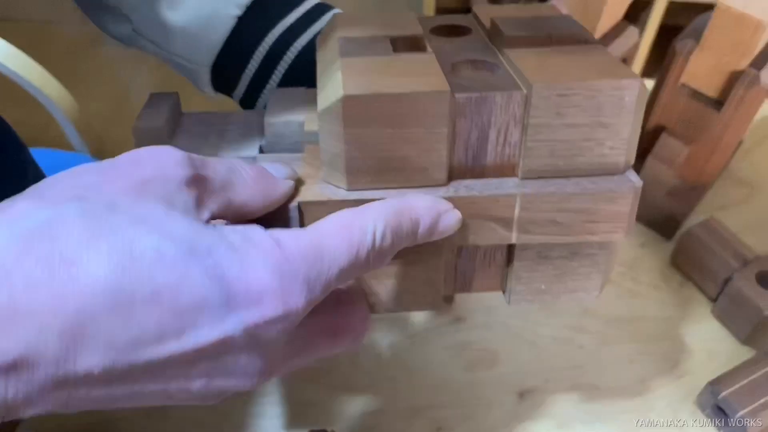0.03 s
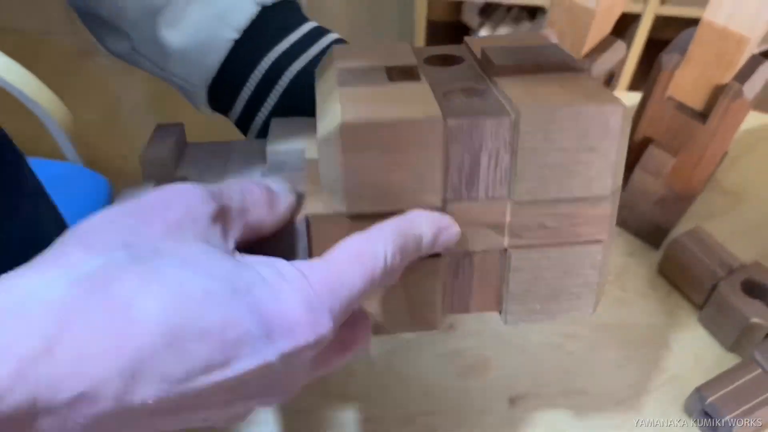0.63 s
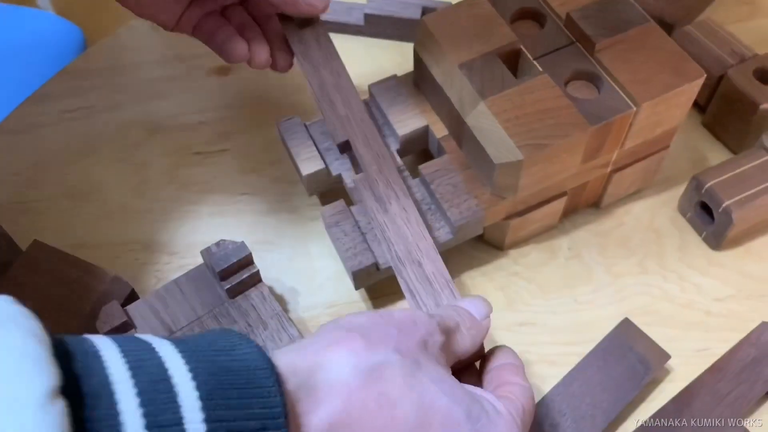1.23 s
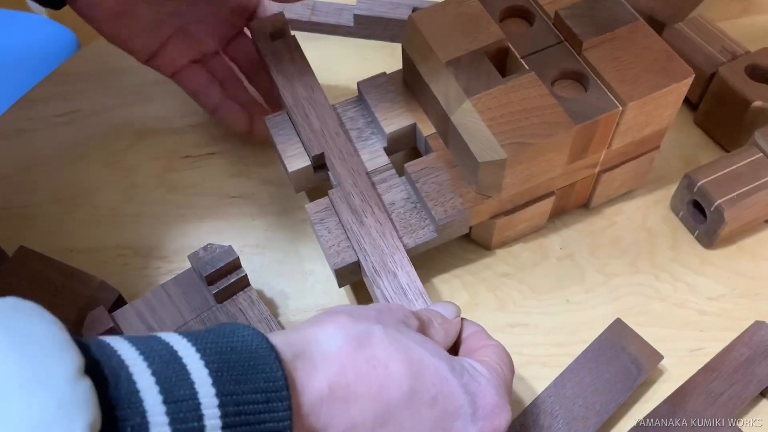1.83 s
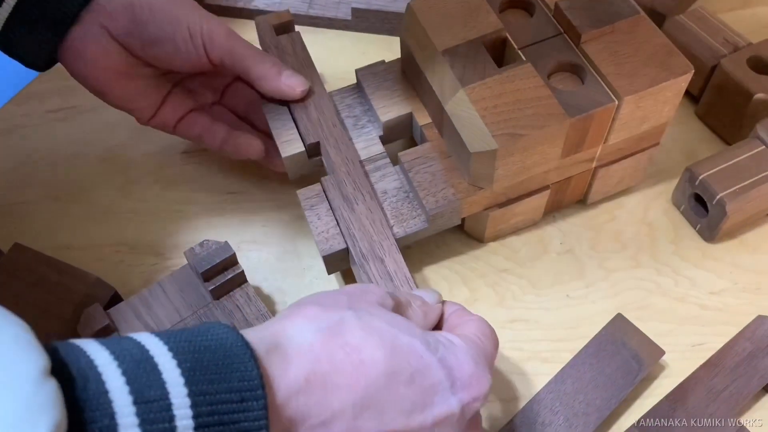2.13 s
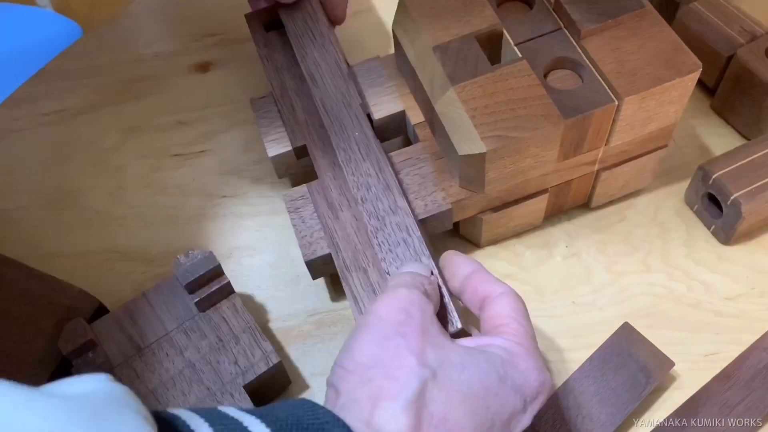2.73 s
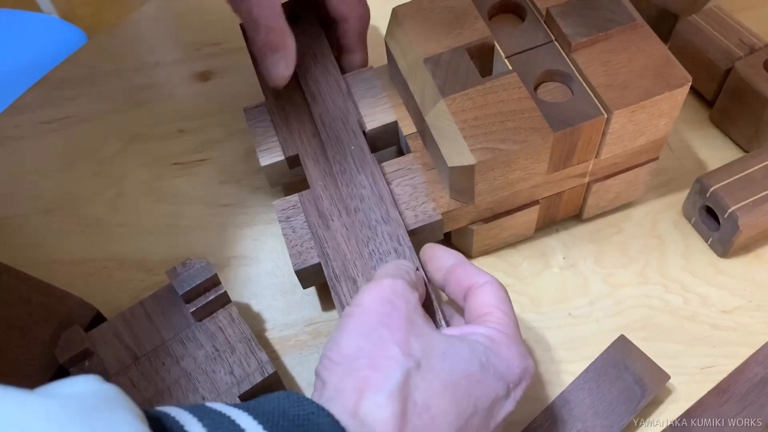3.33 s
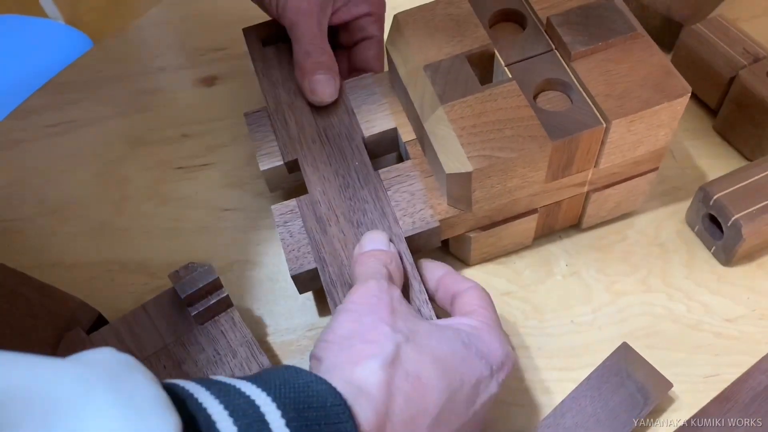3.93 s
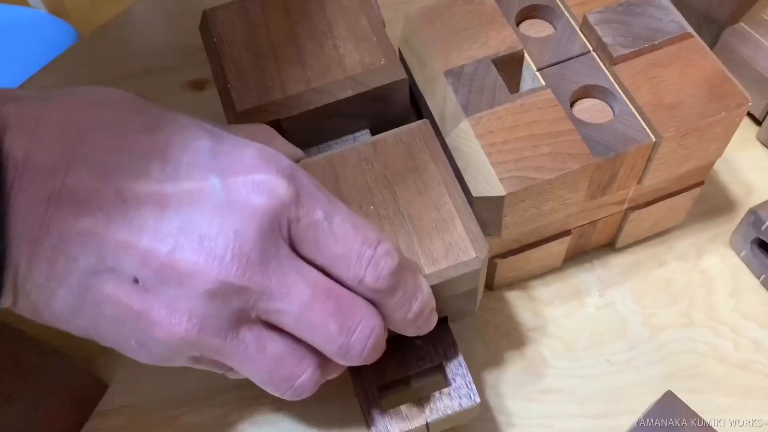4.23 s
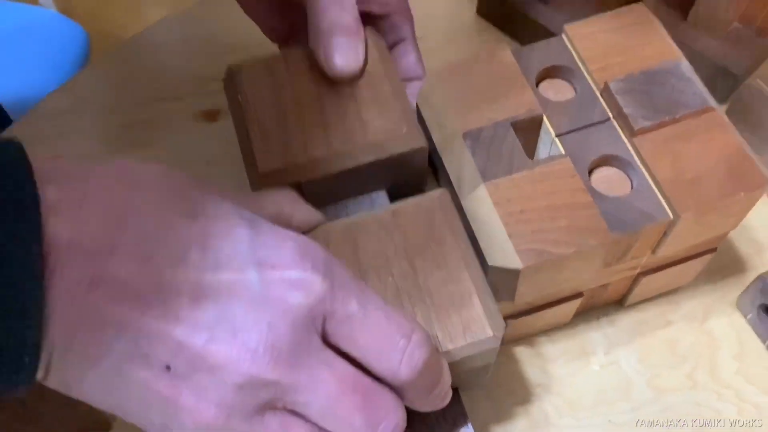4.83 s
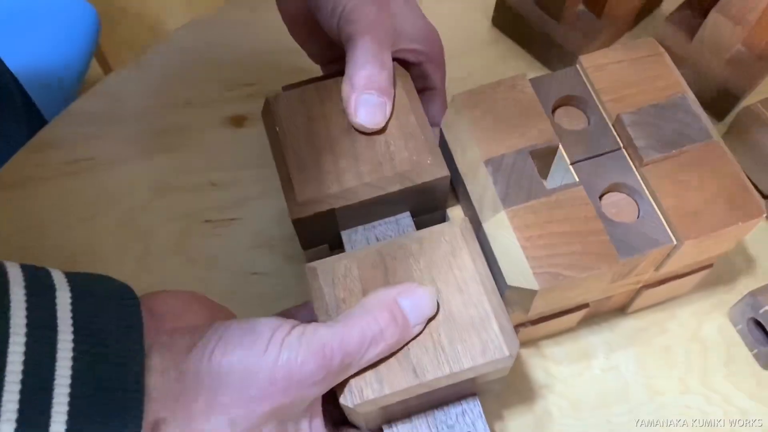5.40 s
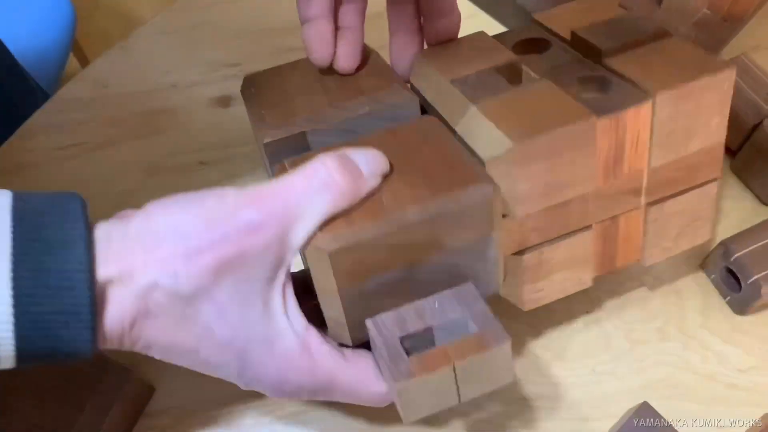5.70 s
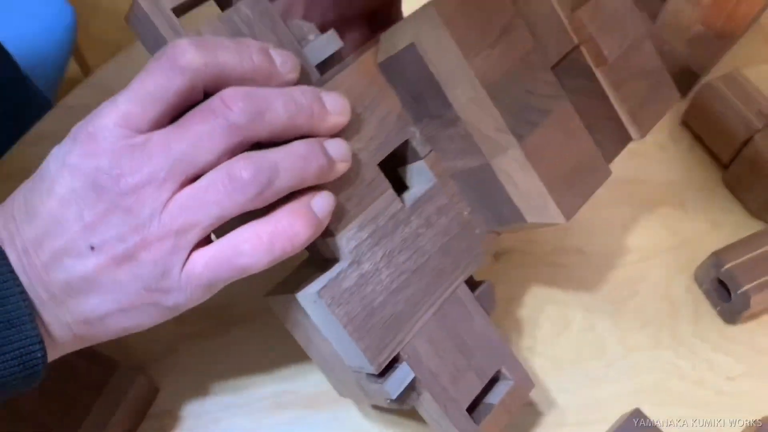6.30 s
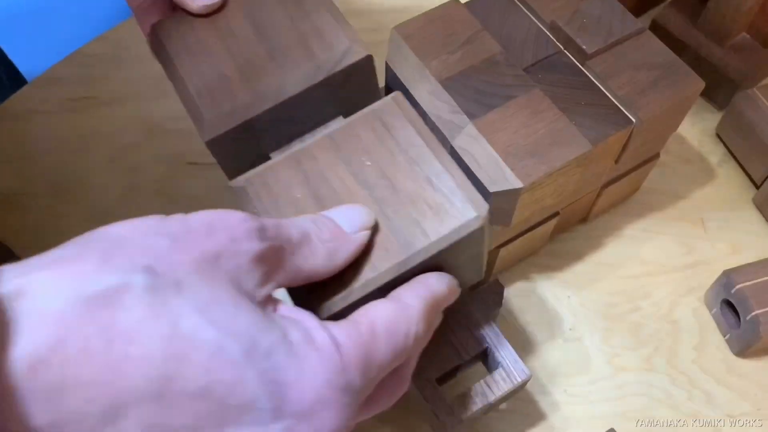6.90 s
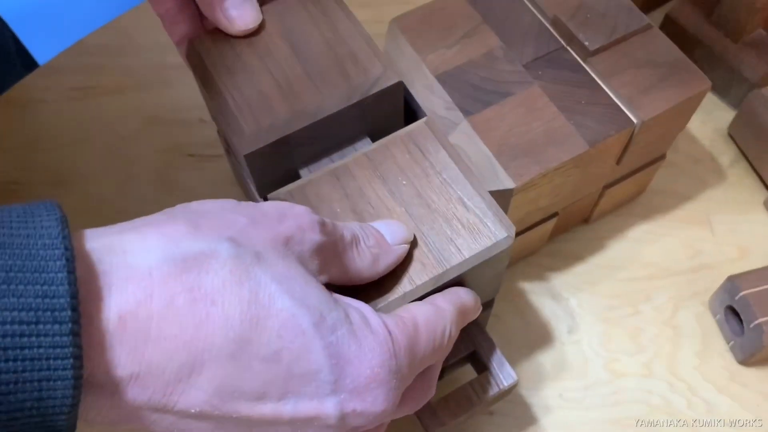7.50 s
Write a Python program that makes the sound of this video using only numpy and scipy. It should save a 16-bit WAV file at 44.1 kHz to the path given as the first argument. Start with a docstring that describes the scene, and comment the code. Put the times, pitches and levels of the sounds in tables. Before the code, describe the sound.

Hands join the hardwood pieces of a large puzzle on a table. Light clicks and rubbing come first, then scattered hollow knocks. A sharp clack leads into a busier run of knocks, table thumps and short scrapes, with a tiny squeak and the loudest clack past the middle. Soft sliding follows, then a few dull thumps and a faint rattle. The microphone is close, in a small quiet room.

```python
"""Fitting a wooden puzzle together

Hands join the hardwood pieces of a large puzzle on a table, close to a phone in a small quiet room.
Each contact rings the piece (clack), the half-built frame (knock) and the table top (thump); less reaches
the table when the work is lifted. In between, hands press the frame down, wood slides on wood with ticks,
rattles and squeaks, fingers brush the grain, and a tight joint judders once."""
import sys
import numpy as np
from scipy import signal
from scipy.fft import rfft, irfft, next_fast_len
from scipy.io import wavfile
from scipy.ndimage import uniform_filter1d

SR = 44100
rng = np.random.default_rng(int(sys.argv[2]) if len(sys.argv) > 2 else 0)


def materialize(psi):
    """Save the field psi as 16-bit PCM at rate SR to the path in sys.argv[1].

    A 1-D psi becomes a single channel; in a 2-D psi each row is a channel.
    """
    bounded = np.clip(np.atleast_2d(psi).T, -1, 1)
    quanta = np.round(bounded * 32767).astype(np.int16)
    wavfile.write(sys.argv[1], SR, quanta)


N = 332955
T = np.arange(N) / SR
RING_T = np.arange(16384) / SR  # time axis of one ringing blow

# A mode is a tone that an object rings at; t60 is the time it takes to fade by 60 dB.
# modes of the half-built frame and of a thick block: f/Hz, level/dB, t60/s
FRAME_MODES = [(330.4, -4.5, 0.035), (321.5, 0, 0.07), (407.9, -3, 0.11), (469.8, -7, 0.065),
               (538.3, -11, 0.08), (614, -12, 0.055)]
BLOCK_MODES = [(665, -5, 0.024), (1316, -3, 0.018), (1486, -3, 0.016), (1840, -0.5, 0.01),
               (3190, -11.5, 0.011), (4065, -15, 0.02), (4600, -14.5, 0.012), (8430, -30.5, 0.01)]
# stages of the work: start/s, piece in hand (from 3.41 s the bars laid side by side, which ring like one thick
# block), rumble over rasp/dB, hiss over rasp/dB, background change/dB
STAGES = [(0, "body", -14, -11, 0), (0.75, "bar", 10, -15, 0), (2.642, "bar", 3, -11.5, -1.5),
          (3.41, "block", 3, -11, -2), (4.113, "block", 7.5, -12.5, -1), (4.68, "cap", 2, -14.5, 6),
          (5.406, "body", -22.5, -28, 1.5), (6.667, "block", 27, -22.5, 0)]
# wood slides on wood, and fingers brush the grain: start/s, end/s, level/dB
SLIDES = [(0.057, 0.292, -55), (1.955, 2.297, -61.5), (2.674, 2.866, -53.5), (2.993, 3.15, -63),
          (3.262, 3.394, -47), (4.21, 4.291, -53), (4.293, 4.487, -65.5), (4.693, 4.766, -46.5),
          (4.759, 4.776, -31.5), (4.801, 5.001, -48), (5.0, 5.232, -57.5), (5.467, 5.553, -58.5),
          (5.599, 5.796, -59), (5.789, 6.201, -61.5), (6.382, 6.661, -66), (6.7, 7.5, -86.5)]
BRUSHES = [(0.144, 0.172, -44.5), (0.21, 0.252, -51), (0.261, 0.3, -54), (0.428, 0.452, -63.5),
           (0.652, 0.735, -66), (1.242, 1.257, -55), (1.957, 2.136, -64), (2.784, 2.834, -60),
           (3.302, 3.39, -53.5), (5.78, 5.901, -62.5), (5.955, 6.007, -57.5), (6.053, 6.214, -65.5),
           (6.482, 6.62, -62.5)]


def knocks():
    """Wood strikes wood; the faces graze each other just before each blow lands."""
    # t/s, table thump/dB, frame knock/dB, piece clack/dB, hardness/dB, tone the struck spot favours/Hz
    blows = [(0.049, -80.5, -56, -40, -8, 1770), (0.154, -69, -54.5, -36, -22, 1000),
             (0.212, -75, -49, -38.5, -8.5, 1570), (0.243, -62.5, -57, -48.5, -22, 1120),
             (0.337, -75, -55, -42, -21.5, 1000), (0.443, -81, -63, -51, -18, 1230),
             (1.248, -46.5, -35.5, -42, -13, 324), (1.463, -54, -45, -41.5, -15.5, 1350),
             (1.61, -46.5, -39, -50, -15, 345), (1.748, -50.5, -48.5, -50, -19.5, 342),
             (2.087, -46.5, -41.5, -40, -24, 1195), (2.846, -40.5, -39.5, -49.5, -9.5, 322),
             (3.188, -37.5, -35.5, -25, 4, 4300), (3.329, -41, -44, -38.5, -11.5, 1100),
             (3.423, -38.5, -34.5, -67.5, -18.5, 410), (3.477, -30, -28.5, -27, -6, 2000),
             (3.61, -41.5, -31, -46.5, -17.5, 317), (3.881, -43.5, -51, -51.5, -22.5, 1110),
             (3.933, -30.5, -26, -46.5, -29.5, 332), (4.023, -44, -48.5, -52.5, -25, 1480),
             (4.419, -54, -58.5, -53.5, -8, 2220), (4.489, -24.5, -32, -25.5, -11, 1400),
             (4.636, -30, -28, -48.5, -20.5, 320), (4.703, -34, -33.5, -57.5, -15, 300),
             (4.772, -32, -30, -17.5, -2.5, 1650), (4.917, -37, -41, -46, -30, 350),
             (5.111, -61, -48.5, -53, -8.5, 530), (5.254, -30.5, -29, -30, -15, 468),
             (5.804, -71, -62, -41.5, -14, 1050), (6.021, -75, -72, -54, -13, 600),
             (6.084, -55, -80, -59, -9, 1820), (7.004, -33.5, -34.5, -42, -9, 640),
             (7.295, -34, -40, -61, 1, 294)]
    graze_s, graze_over_clack_db = 0.018, -17.5
    out = np.zeros((2, N))
    for s, thump_db, knock_db, clack_db, hard_db, spot_hz in blows:
        modes = stage_at(s)[0]
        add(out, s - graze_s, at_level(graze(graze_s, modes), graze_s, clack_db + graze_over_clack_db))
        piece, frame = favour(modes, spot_hz), favour(FRAME_MODES, spot_hz)
        add(out, s, contact(piece, frame, thump_db, knock_db, clack_db, hard_db))
    return out


def presses():
    """A hand presses the frame onto the table: a soft thump that barely rings the wood."""
    pushes = [(1.437, -43), (1.965, -45), (2.114, -50), (2.514, -44), (2.823, -41), (4.084, -43),
              (4.764, -33), (7.061, -35.5), (7.149, -33), (7.247, -39), (7.384, -41)]  # t/s, thump/dB
    rise = 1 - np.exp(-RING_T / 0.0033)
    out = np.zeros((2, N))
    for s, db in pushes:
        press = contact(stage_at(s)[0], damped(FRAME_MODES),
                        thump_db=db, knock_db=db - 8.5, clack_db=db - 22, hard_db=-15)
        add(out, s, press * rise)
    return out


def contact(piece_modes, frame_modes, thump_db, knock_db, clack_db, hard_db):
    """Every contact shakes the piece in the hand, the frame it meets and the table below."""
    table_modes = [(52, -11, .15), (129, 5, 0.1), (155, 1, 0.11), (172.7, 0, 0.086), (201, -6, 0.074)]  # the table top: f/Hz, level/dB, t60/s
    frame = unit(ring(frame_modes, scatter_db=3.5, detune=0.028, travel_s=0.00074))
    frame += undb(-11.5) * unit(band(burst(t60=0.13), 120, 870))
    table = ring(table_modes, scatter_db=4.5, detune=0.01, travel_s=0.0017)
    knock = undb(knock_db) * frame / strength(frame, 250, 750)
    thump = undb(thump_db) * table / strength(table, 80, 230)
    return undb(clack_db) * clack(piece_modes, hard_db) + knock + thump


def clack(modes, hard_db, grain_db=-8, grain_t60=0.037, bounce_db=-8):
    """A piece and its grain ring, the faces bounce shut, and a soft contact loses its treble."""
    x = unit(ring(modes, scatter_db=3, detune=0.015, travel_s=0.00057))
    x += undb(grain_db) * grain(modes, grain_t60)
    gap = int(SR * rng.uniform(.001, .003))
    bounce = np.pad(grain(modes, grain_t60), ((0, 0), (gap, 0)))[:, :len(RING_T)]
    x += undb(bounce_db) * bounce
    # hardness is the treble level over the middle range; tilt the sound towards it
    tilt_db = hard_db - 20 * np.log10(strength(x, 2800, 7000) / strength(x, 800, 2600))
    x = colour(x, [(1100, 0.0053), (2300, 0.81 * tilt_db), (3600, 1.42 * tilt_db),
                   (9000, 2.7 * tilt_db), (15000, 1.5 * tilt_db - 9)])
    return x / strength(x, 800, 2600)


def ring(modes, scatter_db, detune, travel_s, lag_s=.0001, side_db=3):
    """Wood rings, struck at a random spot under a changing grip; high modes spread unevenly to the sides."""
    out, sides = 0, np.array([[-.5], [.5]])
    for hz, db, t60 in modes:
        spot, grip, path, lean = rng.standard_normal(4)
        delay_s = travel_s * np.sqrt(1000 / hz)  # low bending waves arrive later
        t = np.maximum(RING_T - delay_s - sides * lag_s * (1 + 1.1 * path), 0)
        gain = undb(db + scatter_db * spot + sides * side_db * lean * min(hz / 1500, 2))
        rise = 1 - np.exp(-t / (0.0011 + 0.16 / hz))
        out = out + gain * rise * decay(t, t60) * np.sin(2 * np.pi * hz * (1 + detune * grip) * t)
    return out


def grain(modes, t60, below_db=-15, above_db=-9):
    """Many short-lived modes of the touching wood crowd around a piece's own."""
    points = sorted((hz, db) for hz, db, _ in modes)
    (low_hz, low_db), (top_hz, top_db) = points[0], points[-1]
    curve = [(low_hz / 2, low_db + below_db), *points, (2 * top_hz, top_db + above_db)]
    return unit(colour(burst(t60), curve))


def burst(t60):
    """Fading noise stands for a crowd of modes and nearby echoes."""
    return stereo_noise(len(RING_T)) * (1 - np.exp(-RING_T / .0008)) * decay(RING_T, t60)


def favour(modes, spot_hz, boost_db=4.5, octaves=0.31):
    """The struck spot drives the modes near one frequency harder."""
    return [(hz, db + boost_db * np.exp(-(np.log2(hz / spot_hz) / octaves) ** 2), t60)
            for hz, db, t60 in modes]


def damped(modes):
    """Modes under a hand die twice as fast."""
    return [(hz, db, t60 / 2) for hz, db, t60 in modes]


def stage_at(s):
    """Modes of the piece in hand at time s, and how much a slide rumbles and hisses then (dB)."""
    # the assembled body, a slim bar and the capping block: f/Hz, level/dB, t60/s
    body = [(598, -0.5, 0.025), (734, 1, 0.022), (1078, 2, 0.02), (1198, 3, 0.019), (1647, 3, 0.012),
            (1874, 0.5, 0.015), (2268, -3.5, 0.0226), (2740, -5.5, 0.0062), (4510, -21, 0.0457)]
    bar = [(1160, -4.5, 0.016), (1262, -3.5, 0.026), (1440, -2, 0.016), (1830, -4, 0.013),
           (2220, 0.5, 0.021), (3180, -7, 0.03), (3590, -3.5, 0.021), (4070, 1, 0.0082), (4400, -4, 0.035),
           (8400, -11, 0.025), (10800, -15.5, 0.018)]
    cap = [(614, -13, 0.032), (1394, -1.5, 0.015), (1616, -1, 0.016), (1819, -2, 0.022), (2204, 1, 0.026),
           (2570, 0.5, 0.016), (3517, -0.5, 0.022), (3850, -4.5, 0.014), (5650, -11.5, 0.0054),
           (7460, -13, 0.014)]
    pieces = {"body": body, "bar": bar, "block": BLOCK_MODES, "cap": cap}
    _, piece, rumble_db, hiss_db, _ = STAGES[sum(s >= row[0] for row in STAGES[1:])]
    return pieces[piece], rumble_db, hiss_db


def graze(length, modes, growth_db=13):
    """A short rasp that grows until the blow lands."""
    x = rasp(length, modes)
    return x * undb(growth_db * np.minimum(T[:x.shape[1]] / length, 1))


def sliding():
    """Wood dragged over wood rasps in the piece, rumbles in the table and hisses in the grain."""
    # tone of the table's rumble, and the dulling of the hiss compared with fingers: f/Hz, level/dB
    rumble_curve = [(30, -22.5), (65, -1), (125, 3), (190, 6), (250, -9), (330, -5.5), (480, -15.5),
                    (750, -25.5), (1500, -48)]
    dulling = [(8500, -2), (13000, -10.5)]
    out = np.zeros((2, N))
    for start, length, db in spans(SLIDES):
        modes, rumble_db, hiss_db = stage_at(start)
        rumble = colour(friction(length, slips_per_s=1300, spread_db=3, flicker_db=-2.5), rumble_curve)
        layers = (rasp(length, modes), 0), (rumble, rumble_db), (colour(hiss(length), dulling), hiss_db)
        for layer, over_db in layers:
            add(out, start - .005, at_level(layer, length, db + over_db))
    return out


def rasp(length, modes):
    """Closely packed slips ring the piece that is dragged."""
    rasp_curve = [(200, -13.5), (550, -6), (1150, -4), (2200, -2), (3000, -9.5), (4400, -9), (6000, -11.5),
                  (10000, -30.5)]  # tone of the rasp: f/Hz, level/dB
    slips = friction(length, slips_per_s=8700, spread_db=0.4, flicker_db=6)
    return colour(resonate(slips, modes, dry_db=6), rasp_curve)


def hiss(length):
    """The grain hisses under a stroke and rings its high modes."""
    grain_modes = [(4257, -1.5, 0.011), (5070, -7, 0.004), (8580, 0, .012), (9510, -3, .01)]  # f/Hz, level/dB, t60/s
    hiss_curve = [(2500, -24), (4400, -4), (6200, -4), (8300, -2), (10500, 2.5), (13500, -0.5),
                  (16000, -17)]  # tone of the hiss: f/Hz, level/dB
    slips = friction(length, slips_per_s=3000, spread_db=3, flicker_db=3.5)
    return colour(resonate(slips, grain_modes, dry_db=2), hiss_curve)


def friction(length, slips_per_s, spread_db, flicker_db, edge_s=0.029):
    """One stroke: countless tiny slips of uneven size, in fits and starts, with time to ring out."""
    t = T[:int((length + .1) * SR)]
    edge_s = min(edge_s, length / 2)
    slipping = rng.random(len(t)) < slips_per_s / SR
    sizes = undb(spread_db * np.minimum(rng.exponential(size=len(t)), 4))
    fade = np.clip(np.minimum(t, length + edge_s - t) / edge_s, 0, 1)
    pressure = fade * (1 + .5 * np.sin(np.pi * t / length))
    slips = two_mics(slipping * sizes * rng.standard_normal((2, len(t))))
    return slips * pressure * undb(flicker_db * wander(70, len(t)))


def resonate(x, modes, dry_db):
    """Rubbing is heard partly through the ringing wood, partly straight from the contact (dry)."""
    response = ring(modes, scatter_db=5, detune=0.031, travel_s=0.000099)
    ringing = signal.fftconvolve(x, response, axes=1)[:, :x.shape[1]]
    return unit(ringing) + undb(dry_db) * unit(x)


def ticks(grit_per_s=110, grit_db=-2.5, scatter_db=4):
    """Rubbing catches on grit at random, as hard as the stroke presses; a few catches stand out."""
    catches = [(0.167, -38.5, 1200), (0.204, -31, 1500), (0.329, -34.5, 995), (1.971, -44, 4470),
               (2.803, -35, 12540)]  # a sliding edge catches: t/s, peak/dB, f/Hz
    out = np.zeros((2, N))
    for place, chance, pitch in rng.random((int(grit_per_s * N / SR), 3)):
        s = place * N / SR
        pressure = sum(undb(db) for start, end, db in SLIDES + BRUSHES if start <= s < end)
        size = undb(grit_db + scatter_db * min(-np.log(1 - chance), 3))
        add(out, s, pressure * size * tick(1800 * 5 ** pitch))
    for s, db, hz in catches:
        add(out, s, undb(db) * tick(hz))
    return out


def tick(hz, t60=0.006):
    """A rough spot lets go: a tiny crack that rings briefly around one frequency."""
    crack = rng.standard_normal((2, 1024)) * decay(T[:1024], t60)
    x = band(crack, .7 * hz, min(1.35 * hz, .45 * SR))
    return x / abs(x).max()


def brushing():
    """Fingers passing over the wood raise only the hiss of the grain."""
    out = np.zeros((2, N))
    for start, length, db in spans(BRUSHES):
        add(out, start - .005, at_level(hiss(length), length, db))
    return out


def rattling():
    """Loose joints chatter: a low grumble in the frame and a dry clatter in the piece."""
    rattles = [(0.16, 0.289, -62, -52), (1.821, 1.934, -61.5, -65.5), (2.721, 2.751, -56.5, -68.5),
               (5.495, 5.535, -63, -51.5), (7.019, 7.1, -52, -63), (7.138, 7.257, -54.5, -70),
               (7.301, 7.39, -51, -59)]  # start/s, end/s, frame/dB, piece/dB
    out = np.zeros((2, N))
    for start, end, frame_db, piece_db in rattles:
        length = end - start
        grumble = chatter(length, damped(FRAME_MODES[3:]) + BLOCK_MODES[:1], t60=.012)
        clatter = chatter(length, stage_at(start)[0], t60=0.0076)
        add(out, start, at_level(band(grumble, 230, 850), length, frame_db))
        add(out, start, at_level(band(clatter, 600, 2200), length, piece_db))
    return out


def chatter(length, modes, t60, bumps_per_s=120, scatter_db=3.5):
    """Uneven little bumps ring the wood around its modes."""
    bumps = np.zeros((2, N))
    count = int(length * bumps_per_s) + 1
    for k, (late, size) in enumerate(zip(rng.random(count), rng.standard_normal(count))):
        bump = rng.standard_normal((2, 2048)) * decay(T[:2048], t60)
        add(bumps, (k + .8 * late) / bumps_per_s, undb(scatter_db * size) * bump)
    return resonate(two_mics(bumps[:, :int((length + .1) * SR)]), modes, dry_db=0)


def judder(start_s=2.905, length=.085, slip_hz=68, db=-42):
    """A tight joint sticks and slips in a short, regular run that drums on the table."""
    progress = np.clip((T - start_s) / length, 0, 1)
    phase = 2 * np.pi * slip_hz * T
    drumming = np.sin(phase) + undb(-10) * np.sin(2 * phase)
    return undb(db) * np.sqrt(2) * np.sin(np.pi * progress ** .6) * drumming


def squeaks(width_hz=450):
    """Slips between tight faces feed one thin, high tone, which glides as the contact moves."""
    glides = [(1.928, 1.999, -65, 4440, 4460), (2.884, 2.927, -67, 4220, 4050),
              (4.714, 4.767, -50.5, 3420, 3626), (6.07, 6.209, -69.5, 4385, 4960),
              (6.49, 6.64, -72, 5500, 5695), (6.491, 6.649, -68.5, 8660, 8740)]  # start/s, end/s, level/dB, first f/Hz, last f/Hz
    out = np.zeros((2, N))
    for start, end, db, from_hz, to_hz in glides:
        length = max(end - start, .01)
        slips = band(friction(length, slips_per_s=1000, spread_db=1, flicker_db=4), 5, width_hz / 2)
        hz = np.interp(T[:slips.shape[1]], [0, length], [from_hz, to_hz])
        tone = np.sin(2 * np.pi * np.cumsum(hz) / SR)
        add(out, start, at_level(slips * tone, length, db))
    return out


def room(x):
    """The walls return a wash of echoes that builds up over a few milliseconds."""
    echo_bands = [(126, 0.65, -2.5), (287, 0.65, -8.5), (715, 0.53, -7), (1487, 0.45, -9.5),
                  (2940, 0.41, -8.5), (6050, 0.33, -8), (11800, .45, -15.5)]  # f/Hz, t60/s, echo over direct sound/dB
    hz, t60, db = np.transpose(echo_bands)
    log_hz = np.log(np.fft.rfftfreq(SR, 1 / SR) + 1)
    spectrum, t, tail = rfft(stereo_noise(SR)), T[:SR], 0
    for k, weights in enumerate(np.eye(len(hz))):
        band_noise = irfft(spectrum * np.interp(log_hz, np.log(hz), weights), SR)
        fade = decay(t, t60[k]) * (1 - np.exp(-t / 0.002)) * (1 + np.exp(-t / 0.045))
        tail = tail + undb(db[k]) * band_noise * fade / np.linalg.norm(fade)
    return signal.fftconvolve(x, tail, axes=1)[:, :N]


def hum(hz=44, db=-53.5):
    """A low hum wavers during the last stage."""
    gain = undb(db + 1.2 * wander(8))
    fade_in = np.clip((T - STAGES[-1][0]) / 0.022, 0, 1)
    return gain * fade_in * np.sqrt(2) * np.sin(2 * np.pi * hz * T + .3 * wander(10))


def room_air(db=-63):
    """Faint background noise whose level steps up or down at the start of each stage."""
    air_curve = [(25, -8), (50, -1.5), (125, -9), (250, -13.5), (1000, -16), (2200, -23), (4300, -27),
                 (6000, -33), (9500, -29), (15500, -37)]  # tone of the air: f/Hz, level/dB
    starts, *_, change_db = zip(*STAGES)
    stage_db = np.array(change_db)[np.searchsorted(starts[1:], T)]
    air = unit(colour(stereo_noise(N), air_curve))
    return air * undb(db + stage_db + wander(7.7))


def swelling_hiss(start_s=0.852, rise_s=0.033, hold_s=0.364, fade_s=0.077, db=-64.5):
    """A soft hiss swells once and fades."""
    swell_curve = [(150, -9), (1100, -1), (5000, -5), (15000, -23)]  # tone of the hiss: f/Hz, level/dB
    t = np.maximum(T - start_s, 0)
    shape = np.minimum(t / rise_s, 1) * np.exp(-np.maximum(t - hold_s, 0) / fade_s)
    return undb(db) * unit(colour(stereo_noise(N), swell_curve)) * shape


def undb(db):
    """Turn decibels into a gain."""
    return 10 ** (np.asarray(db) / 20)


def unit(x):
    """Scale to an average (rms) level of 1."""
    return x / np.sqrt(np.mean(x ** 2))


def decay(t, t60):
    """A fade that loses 60 dB every t60 seconds."""
    return np.exp(-np.log(1000) * t / t60)


def at_level(x, length, db):
    """Scale a stroke to an average level over its length."""
    return undb(db) * x * np.sqrt(length * SR / np.sum(np.mean(x ** 2, axis=0)))


def strength(x, lo_hz, hi_hz):
    """Average level of a blow's first 30 ms between two frequencies."""
    return np.sqrt(np.mean(band(x[:, :1320], lo_hz, hi_hz) ** 2))


def band(x, lo_hz, hi_hz):
    """Keep what lies between two frequencies."""
    return signal.sosfilt(signal.butter(3, [lo_hz, hi_hz], "band", fs=SR, output="sos"), x)


def colour(x, points):
    """Shape the tone along a curve of (f/Hz, level/dB) points."""
    size = next_fast_len(x.shape[-1] + 4096, real=True) // 2 * 2
    hz, db = np.transpose(points)
    log_hz = np.log(np.fft.rfftfreq(size, 1 / SR) + 1)
    cepstrum = irfft(np.log(undb(np.interp(log_hz, np.log(hz), db))))
    # fold the filter so that it never rings ahead of the sound (minimum phase)
    cepstrum[1:size // 2] *= 2
    cepstrum[size // 2 + 1:] = 0
    return irfft(rfft(x, size) * np.exp(rfft(cepstrum)))[..., :x.shape[-1]]


def two_mics(pair, split_hz=1100):
    """Two unrelated signals as nearby microphones hear them: alike in the bass, apart in the treble."""
    mid, side = rfft(pair)
    hz = np.fft.rfftfreq(pair.shape[-1], 1 / SR)
    share = 0.013 + 0.5 * hz ** 2 / (hz ** 2 + split_hz ** 2)
    mid, side = mid * np.sqrt(abs(1 - share)), side * np.sqrt(share)
    return irfft(np.array([mid + side, mid - side]), pair.shape[-1])


def stereo_noise(n):
    """White noise at the two microphones."""
    return two_mics(rng.standard_normal((2, n)))


def wander(rate, n=N):
    """A smooth random drift, made from `rate` new values a second."""
    hold = int(SR / rate)
    steps = np.repeat(rng.standard_normal(n // hold + 1), hold)
    return 0.91 * uniform_filter1d(uniform_filter1d(steps, hold), hold)[:n]


def spans(table):
    """Turn rows of (start, end, level) into (start, length, level)."""
    return [(start, max(end - start, .01), db) for start, end, db in table]


def add(track, s, sound):
    """Mix a sound in at time s."""
    i = max(int(s * SR), 0)
    track[:, i:i + sound.shape[-1]] += sound[:, :N - i]


def scene():
    """Knocks and rubbing in the room, a little to the right; the level dips briefly between most stages."""
    pan = [(150, -1.5), (1000, 0), (4000, -3), (9000, 0)]  # f/Hz, left over right/dB
    dips = [(0.746, .014, -18), (0.805, 0.063, -9.5), (2.644, 0.0098, -27.5), (4.114, 0.01075, -20),
            (5.406, 0.0184, -20.5), (6.669, 0.013, -17.5)]  # t/s, half length/s, depth/dB
    background = hum() + room_air() + swelling_hiss()
    wood = knocks() + presses() + ticks() + sliding() + brushing() + squeaks() + rattling() + judder()
    direct = np.array([colour(channel, [(hz, side * db / 2) for hz, db in pan])
                       for channel, side in zip(wood, (1, -1))])
    dip_db = sum(depth_db * np.exp(-((T - s) / half) ** 2) for s, half, depth_db in dips)
    return (direct + room(direct) + background) * undb(dip_db)


def record(dry):
    """The phone rounds loud peaks and cuts deep bass and the top; its mics fall out of step near 12 kHz."""
    ceiling, top_hz = 1.05, 15800
    mid = colour((dry[0] + dry[1]) / 2,
                 [(22, -21), (42, -0.5), (10600, -2.5), (11400, -21), (12100, -21.5), (12800, -1.5)])
    side = colour((dry[0] - dry[1]) / 2,
                  [(20, -7.5), (42, 3.5), (2200, -1), (4000, -1), (7500, -2), (11500, -6), (14000, -6.5)])
    rounded = ceiling * np.tanh(np.array([mid + side, mid - side]) / ceiling)
    return signal.sosfilt(signal.ellip(8, .2, 70, top_hz, fs=SR, output="sos"), rounded)


dry = scene()
out = record(dry)
materialize(out)
```